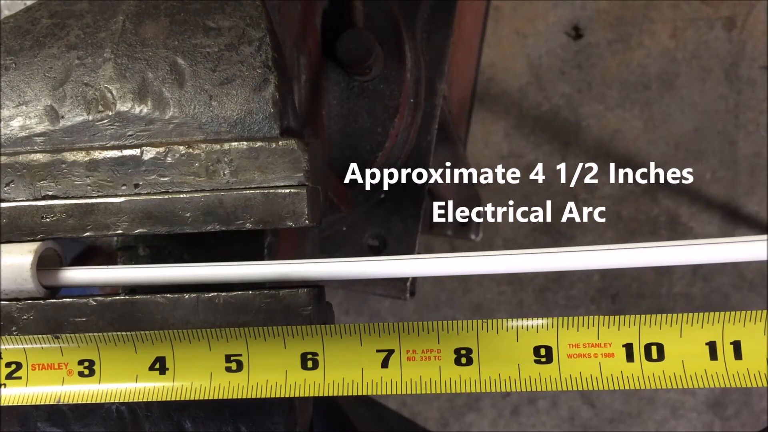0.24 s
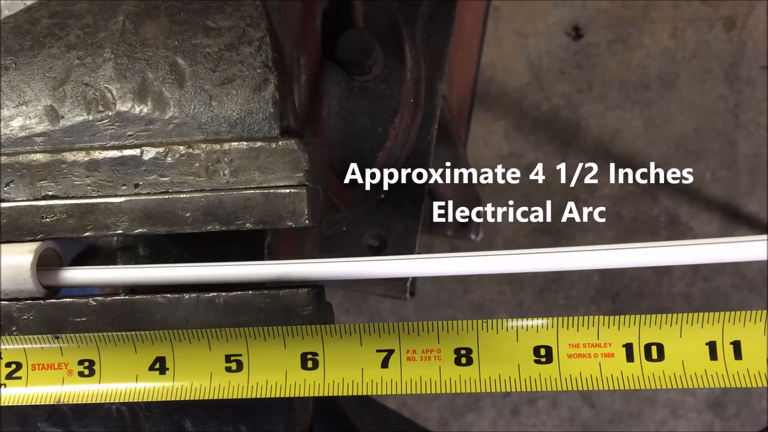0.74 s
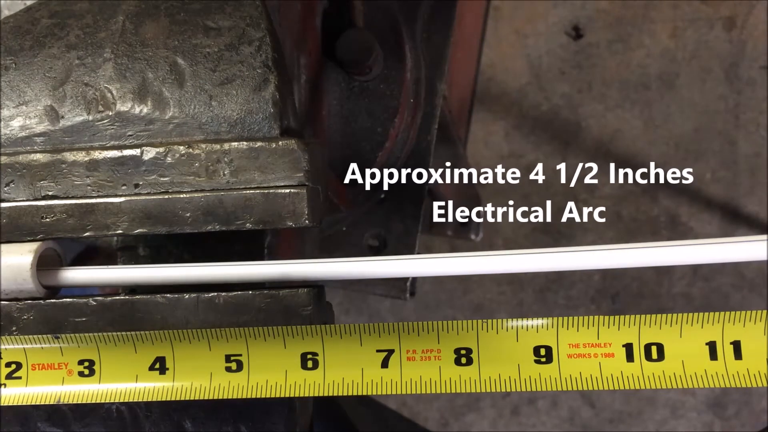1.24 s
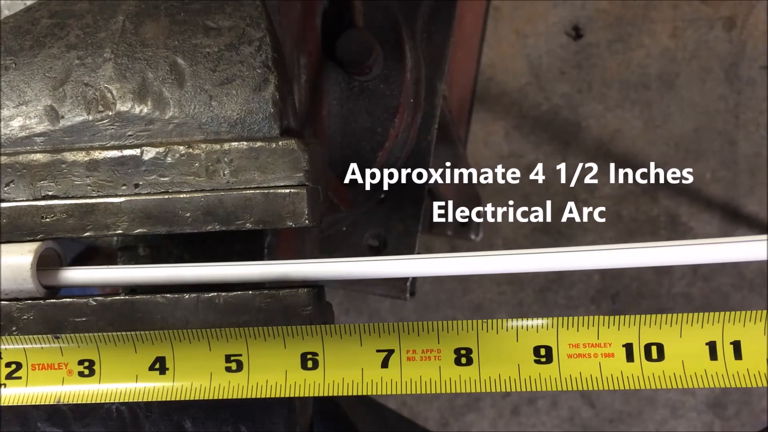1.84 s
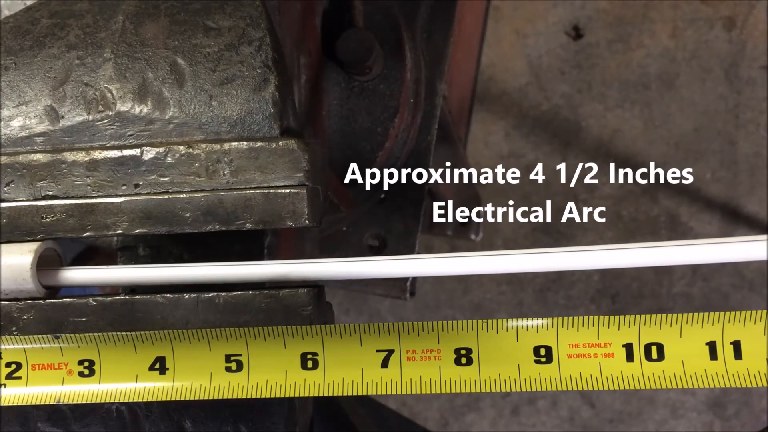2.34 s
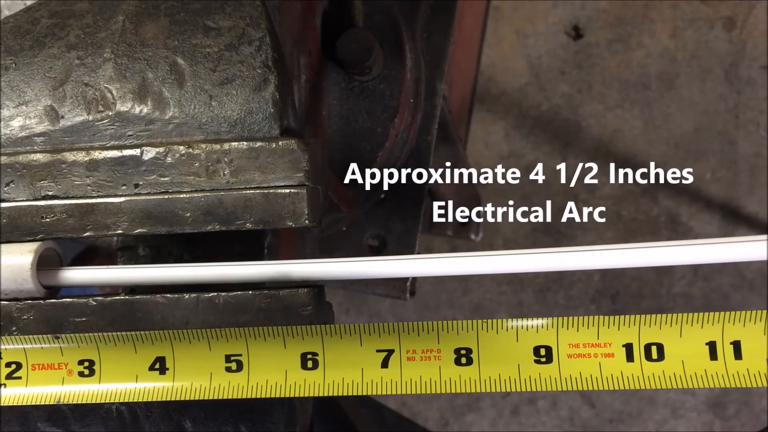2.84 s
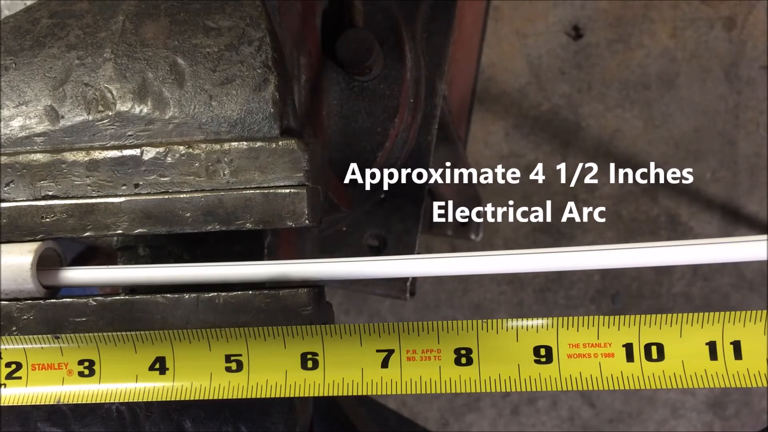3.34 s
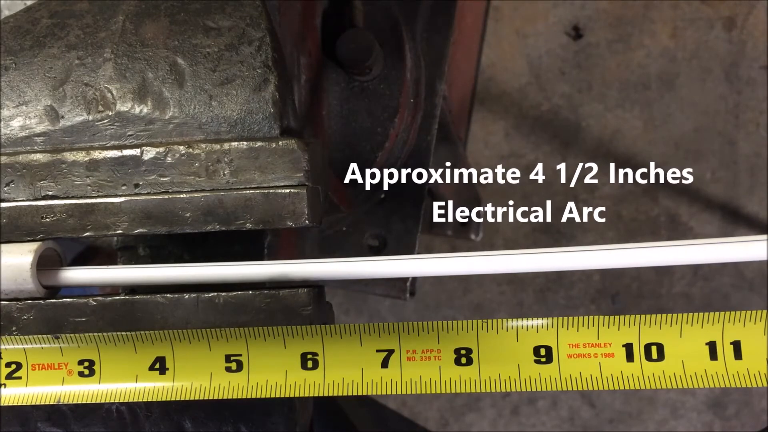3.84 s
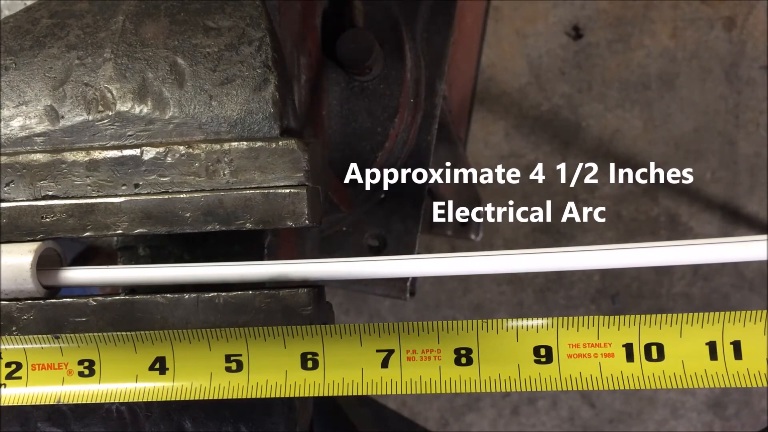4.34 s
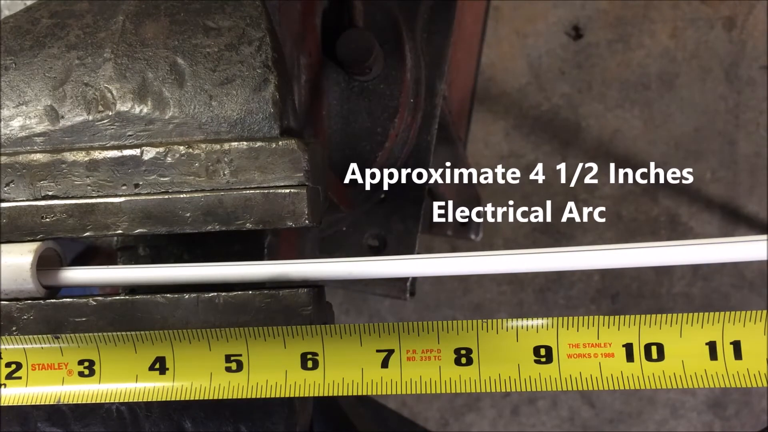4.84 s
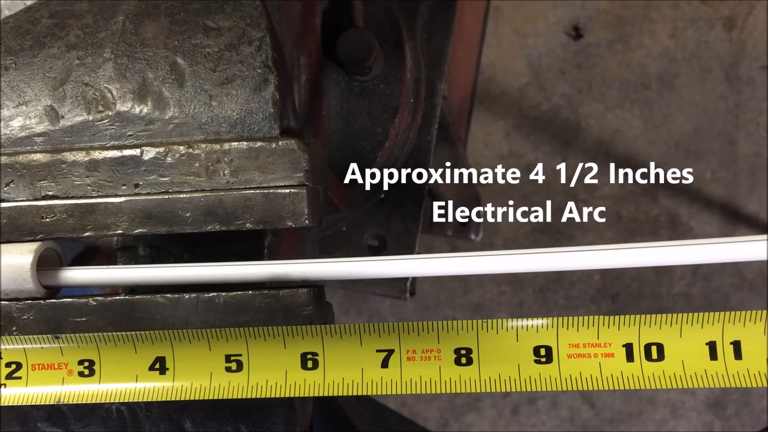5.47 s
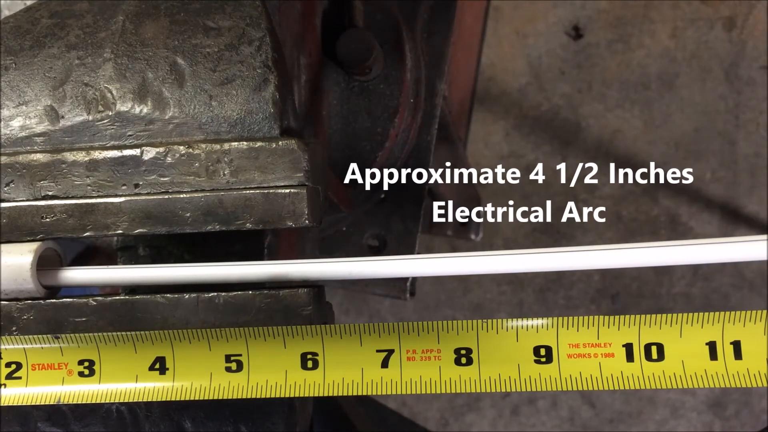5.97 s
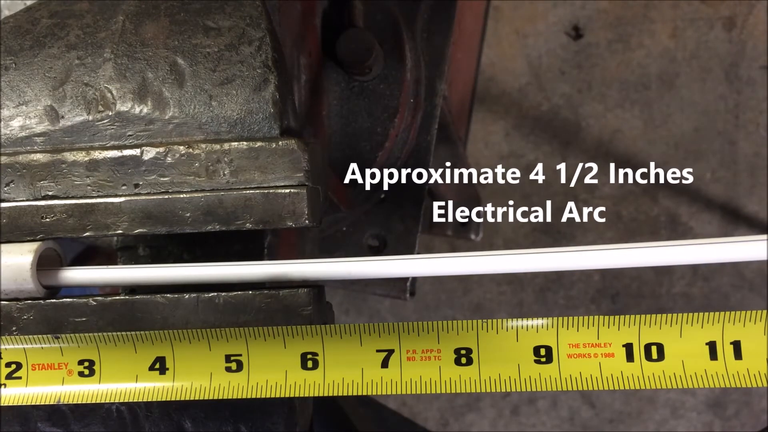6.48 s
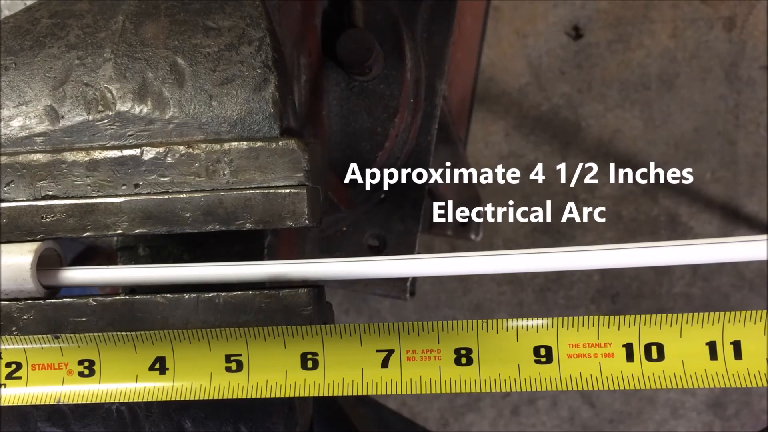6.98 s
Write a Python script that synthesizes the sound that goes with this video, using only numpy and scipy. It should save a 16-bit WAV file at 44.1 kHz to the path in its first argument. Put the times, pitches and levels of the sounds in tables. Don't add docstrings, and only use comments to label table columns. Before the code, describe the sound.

Six violent electric snaps, about one a second, overload a close phone microphone above faint workshop rumble and hiss, some ringing off steel.

```python
import sys
import numpy as np
from scipy import signal
from scipy.fft import rfft, irfft
from scipy.io import wavfile
from scipy.ndimage import uniform_filter1d

SR = 44100
rng = np.random.default_rng(int(sys.argv[2]) if len(sys.argv) > 2 else 0)


def undo_db(level):
    steps = np.asarray(level, float) / 20
    return 10 ** steps


def to_wav(sig):
    pcm = np.clip(np.atleast_2d(sig), -1, 1) * 32767
    pcm = np.round(pcm).astype(np.int16)
    wavfile.write(sys.argv[1], SR, pcm.T)


N = 317961
SPARK_LENGTH, SWELL_LENGTH = 30000, 1050


def evened(x):
    return x / np.sqrt(np.mean(x ** 2) + 1e-20)


def read(points, hz, outside=None):
    f, value = np.transpose(points)
    return np.interp(np.log(hz + 1), np.log(f + 1), value, outside, outside)


def add(mix, s, sound):
    part = mix[round(s * SR):][:len(sound)]
    part += sound[:len(part)]


def coloured(points, count):
    hz = np.fft.rfftfreq(count, 1 / SR)
    spectrum = rfft(rng.standard_normal(count)) * undo_db(read(points, hz, -90))
    return evened(irfft(spectrum, count))


def patchy(points, patchy_db, size):
    frames, hz = N // (size // 4) + 5, np.fft.rfftfreq(size, 1 / SR)
    real, imaginary, patches = rng.standard_normal((frames, len(hz), 3)).T
    patches = uniform_filter1d(patches, size=10, axis=0)
    patches = evened(uniform_filter1d(patches, size=10, axis=1))
    level_db = read(points, hz, -90)[:, None] + patchy_db * patches
    z = (real + 1j * imaginary) * undo_db(level_db)
    return evened(signal.istft(z, nperseg=size, noverlap=3 * size // 4)[1][:N])


def wobble(width_hz, clean, count):
    r = np.exp(-np.pi * width_hz / SR)
    noise = rng.standard_normal((2, count + 8000))
    fuzz = signal.lfilter([1], [1, -2 * r, r * r], noise)[:, 8000:]
    return clean + (1 - clean) * (evened(fuzz[0]) + 1j * evened(fuzz[1]))


def whine(hz, width_hz, clean):
    carrier = np.exp(2j * np.pi * hz * np.arange(N) / SR)
    return evened((wobble(width_hz, clean, count=N) * carrier).real)


def released(hold_s, hold_s_per_db, creep_s):
    s, sink_db = np.array(SPARKS)[:, :1], np.array(JOLTS)[:, -1:]
    since = np.arange(N) / SR - s
    late = np.maximum(since - hold_s - hold_s_per_db * sink_db, 0) / creep_s
    return (since > 0) * (1 + late) * np.exp(-late), sink_db


def ducking():
    since = np.arange(N) / SR - np.array(SPARKS)[:, :1]
    depth_db = 7.5 + 0.45 * np.array(JOLTS)[:, :1]
    held = (since > 0) * np.clip((.21 - since) / 0.062, 0, 1)
    return undo_db(-np.sum(depth_db * held, axis=0))


# f/Hz, level/dB [dB per Hz]
RUMBLE_SPECTRUM = [(12, -60), (25, -27), (43, -10.5), (63, 0.5), (89, 2), (108, -14), (140, -19),
                   (180, -50)]


def rumble():
    return undo_db(-6.5) * patchy(RUMBLE_SPECTRUM, 2.0, size=4096) + undo_db(-2) * whine(78, 9, .5)


# f/Hz, level/dB [dB per Hz]
GROWL_SPECTRUM = [(76, -30), (130, 3), (227, -5.5), (263, -5.5), (330, -15), (480, -27.5), (620, -50),
                  (800, -85)]


def growl():
    return patchy(GROWL_SPECTRUM, 1.5, size=2048)


# f/Hz, level/dB [dB per Hz]
HISS_SPECTRUM = [(260, -34), (450, -7), (1470, -6.5), (1870, -7), (3670, -13.5), (4100, -13.5),
                 (5330, -43.5), (7000, -85)]


def hiss():
    return patchy(HISS_SPECTRUM, 2.3, size=1024)


# f/Hz, level/dB [dB per Hz]
UPPER_SPECTRUM = [(2650, -33), (4500, -3.5), (4870, -6.5), (6810, -8), (10600, -17.5), (14700, -17),
                  (15700, -25), (16000, -39.5)]


def upper_hiss():
    return patchy(UPPER_SPECTRUM, 2.2, size=1024)


def chirping():
    pace_hz = 21.0 * (1 + .2 * evened(uniform_filter1d(rng.standard_normal(N), size=6000)))
    return undo_db(3.0 * np.sin(2 * np.pi * np.cumsum(pace_hz) / SR))


def drone_level():
    rise = np.clip((np.arange(N) / SR - 6.4) / 0.21, 0, 1)
    return -82 + (-63.5 + 82) * rise


# t/s, rumble level/dB, low whine level/dB, high whine level/dB
MACHINE_LEVELS = [(0, -45, -72, -63), (.25, -45, -71.5, -69.5), (.6, -46, -76.5, -72),
                  (1.0, -33, -80, -73.5), (1.35, -39, -79, -74.5), (1.75, -41.5, -80, -76),
                  (2.5, -44, -80, -79), (3.3, -45, -75, -85), (3.8, -43.5, -78.5, -86),
                  (4.6, -48.5, -75, -87), (5.3, -48.5, -77, -86.5), (6, -47, -71.5, -89.5),
                  (6.5, -50, -72.5, -88.5), (7.21, -44.5, -66, -94)]


def workshop():
    held, depth_db = released(0.18, 0.0375, .1)
    sink_db = (held * depth_db).sum(axis=0)
    cut_db = 12 * released(.19, 0.0175, .075)[0].sum(axis=0)
    s, *levels = np.transpose(MACHINE_LEVELS)
    rumble_db, low_db, high_db = [np.interp(np.arange(N) / SR, s, level) for level in levels]
    duck = ducking()

    low = undo_db(rumble_db - 1.15 * sink_db - .75 * cut_db) * rumble()
    low = low + undo_db(-57.5 - 0.79 * sink_db - cut_db) * growl()
    drone = undo_db(drone_level() - sink_db) * whine(259, 17, 0.5)
    air = undo_db(-66.5 - sink_db) * hiss()
    air = air + (undo_db(-76 - 1.3 * sink_db) + undo_db(-89.5)) * upper_hiss()
    whines = undo_db(low_db) * whine(1669, 18, .7)
    whines = whines + undo_db(low_db - 8.5) * whine(1545, 8, 0.5)
    whines = whines + undo_db(high_db) * chirping() * whine(4275, 55, 0.32)
    return duck * low + drone + air + undo_db(-.9 * sink_db) * np.sqrt(duck) * whines


# f/Hz, level/dB [dB per Hz]
DULL_TICK_SPECTRUM = [(250, -12), (700, 0.5), (2000, -5), (3600, -9), (4300, -35)]
# f/Hz, level/dB [dB per Hz]
FORE_SPECTRUM = [(60, -19.5), (140, 1.5), (270, 2.5), (420, -9.5), (800, -19), (1500, -31), (3500, -38),
                 (4100, -57)]


def fore_swell(db):
    t = np.arange(SWELL_LENGTH) / SR
    opening = undo_db(db - 17 - 60 * t / .012) * np.clip(t / 0.0011, 0, 1)
    opening = opening * coloured(DULL_TICK_SPECTRUM, count=4096)[:len(t)]
    swell = undo_db(db + 4 - 1200 * t[::-1]) * np.clip(t / 0.0062, 0, 1)
    return opening + swell * coloured(FORE_SPECTRUM, count=4096)[:len(t)]


# f/Hz, level/dB
CRACK_SPECTRUM = [(300, -22), (1000, -1.5), (4000, 3.5), (7000, -6.5), (10000, 1), (14500, -1),
                  (15800, -15), (16600, -41)]


def tick(db):
    t = np.arange(500) / SR
    decay = undo_db(-60 * t / .005) + undo_db(-20 - 60 * t / 0.046)
    return undo_db(db) * decay * coloured(CRACK_SPECTRUM, count=1024)[:len(t)]


def crack(t, db, t60):
    return undo_db(db - 60 * t / t60) * coloured(CRACK_SPECTRUM, count=len(t))


def jolt(t, db, scale_s):
    phase = 2 * np.pi * 0.6 * np.log(t / scale_s)
    return undo_db(db) * np.exp(-t / .009) * np.sin(phase) * np.clip(t / 0.00055, 0, 1) ** 2


def bench_sway(t, delay_s, db, hz, swell_s):
    late = np.maximum(t - delay_s, 0)
    swell = late / swell_s * np.exp(1 - late / swell_s)
    return undo_db(db) * swell * np.sin(2 * np.pi * hz * late) * np.exp(-(t / 0.12) ** 4)


# f/Hz, level/dB, t60/s
VISE_MODES = [(1235, -8, .17), (2475, -7, .16), (2500, -27, .65), (3750, -1, .08), (3790, -24, .6),
              (5070, -19, .3), (6170, -21, .38), (9170, -22, .25), (9850, -16, .36), (11200, -22, .25)]


def steel(t):
    ring = np.zeros(len(t))
    for hz, db, t60 in VISE_MODES:
        tone = wobble(0.025 * hz, .5, count=len(t)) * np.exp(2j * np.pi * hz * t)
        ring += undo_db(db - 60 * t / t60) * tone.real
    return ring


# f/Hz, level/dB [dB per Hz]
TAIL_SPECTRUM = [(290, -46), (500, -14), (1300, -6.5), (2700, -4.5), (4000, -7), (15000, -8), (15500, -20),
                 (16000, -35)]
# f/Hz, t60/s
ROOM_T60 = [(500, 0.19), (1500, 0.31), (3000, 0.38), (6000, 0.47), (10000, 0.46), (13000, .37),
            (15000, .32)]


def room_tail():
    noise = coloured(TAIL_SPECTRUM, count=SPARK_LENGTH)
    hz, t, z = signal.stft(noise, SR, nperseg=256)
    decay = undo_db(-60 * t / read(ROOM_T60, hz)[:, None])
    return signal.istft(z * decay, SR, nperseg=256)[1][:SPARK_LENGTH]


def spark(crack_db, crack_t60, jolt_db, scale_s, tail_db, sway, steel_db):
    t = np.arange(SPARK_LENGTH) / SR + 1e-5
    early = 1 + undo_db(11.0) * np.exp(-t / 0.014)
    lift = undo_db(9.5 * np.clip((t - .19) / .02, 0, 1))
    lift = lift * undo_db(-2.5 * (jolt_db + 8) * np.minimum(t, .19))
    direct = crack(t, crack_db, crack_t60) + jolt(t, jolt_db, scale_s) + bench_sway(t, *sway)
    return direct + lift * (undo_db(steel_db) * steel(t) + undo_db(tail_db) * early * room_tail())


# t/s, crack level/dB, crack t60/s, steel ring level/dB, fore-tick level/dB
SPARKS = [
    (0.7283, -3, 0.015, -23, -32),
    (1.8118, 1.5, 0.013, -37.5, -42),
    (2.8953, -2, 0.017, -45, -43),
    (3.9787, 0.5, 0.0057, -49, -41.5),
    (5.0620, 3.5, 0.0068, -49.5, -38.5),
    (6.1455, 0, 0.012, -31, -50.5),
]
# level/dB, time scale/s, room tail level/dB, gain sink level/dB
JOLTS = [
    (-7.5, .0016, -37, 0.85),
    (7, .0043, -34.5, 4),
    (11.5, .0046, -37.5, 9),
    (4, .0042, -37, 5),
    (12.5, .0045, -37, 8.5),
    (3, .0044, -38.5, 3),
]
# delay t/s, level/dB, f/Hz, swell time t/s
SWAYS = [
    (.0067, -26.5, 52, .01),
    (.0158, -12, 51, .009),
    (.0149, 0, 44, .0048),
    (.022, -12.5, 52, .0049),
    (.0163, -.5, 44, 0.00504),
    (.013, -11, 43, 0.0086),
]


def scene():
    mix = workshop()
    tick_lead_s = .0116
    for (s, crack_db, crack_t60, steel_db, tick_db), (*jolts, _), sway in zip(SPARKS, JOLTS, SWAYS):
        add(mix, s - SWELL_LENGTH / SR, fore_swell(-15.5 + .48 * sway[1]))
        add(mix, s - 2 * tick_lead_s, tick(tick_db))
        add(mix, s - tick_lead_s, tick(tick_db - 4))
        add(mix, s, spark(crack_db, crack_t60, *jolts, sway, steel_db))
    next_s = 7.2056
    add(mix, next_s, fore_swell(-21.0))
    add(mix, next_s, tick(-43))
    return mix[None]


TREBLE_DIPS = [.988, 1.39, 1.455, 1.54, 2.205, 3.045, 3.75, 3.82, 4.59, 4.97, 5.215, 6.11, 6.341, 6.405,
               6.705]


def treble_dips(x):
    high_pass = signal.firwin(255, 3000, pass_zero=False, fs=SR)
    treble = signal.oaconvolve(x, high_pass[None], "same")
    since = np.arange(N) / SR - np.array(TREBLE_DIPS)[:, None]
    dip = np.exp(-(since / 0.0056) ** 4).max(axis=0)
    return x - .72 * dip * treble


def low_pass(x):
    return signal.sosfilt(signal.butter(12, 16490, fs=SR, output="sos"), x)


def record(dry):
    ceiling = 0.46
    knee = np.tanh(np.abs(dry / ceiling) ** 3) ** (1 / 3)
    clipped = ceiling * np.sign(dry) * knee + 0.0087 * dry
    limited = signal.oaconvolve(clipped, signal.firwin(255, 15400, fs=SR)[None], "same")
    mix = treble_dips(limited + undo_db(-24) * clipped)
    return low_pass(mix)


dry = scene()
out = record(dry)
to_wav(out)
```